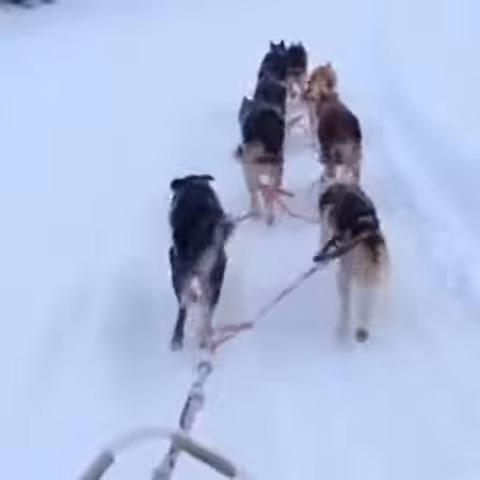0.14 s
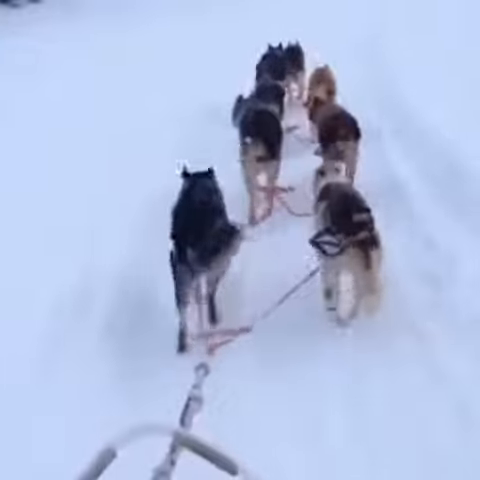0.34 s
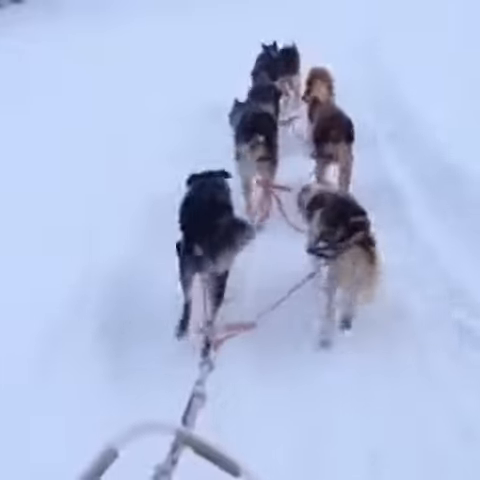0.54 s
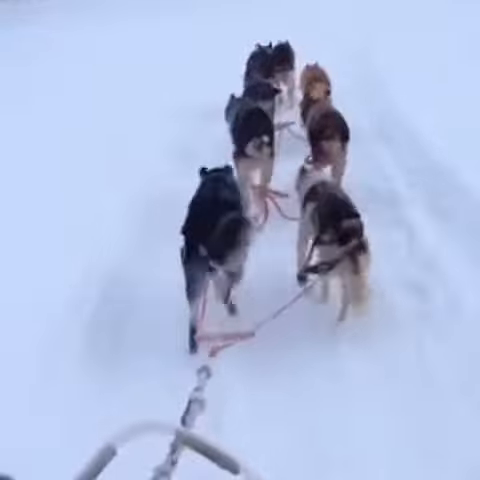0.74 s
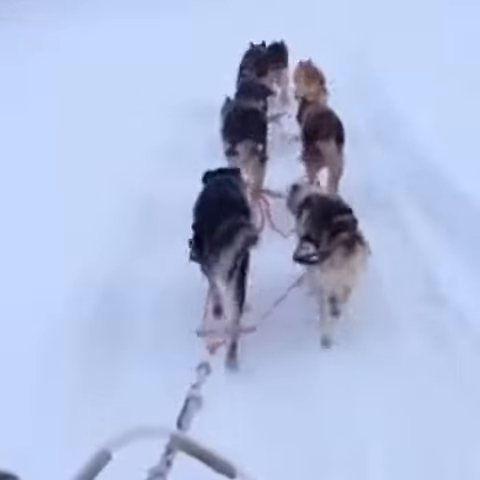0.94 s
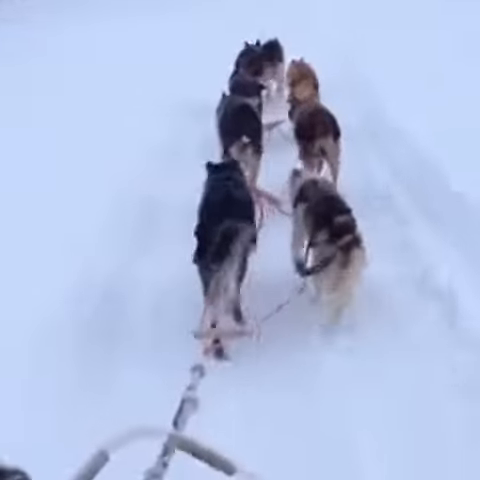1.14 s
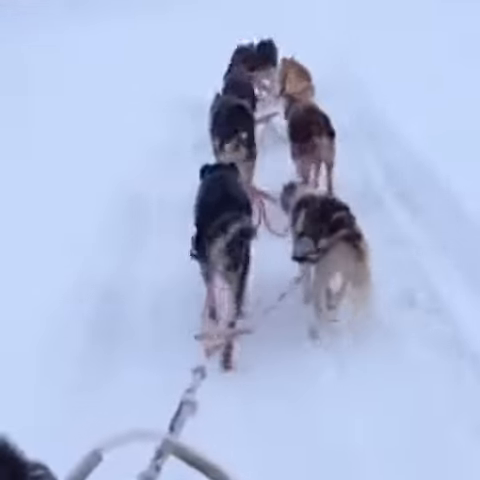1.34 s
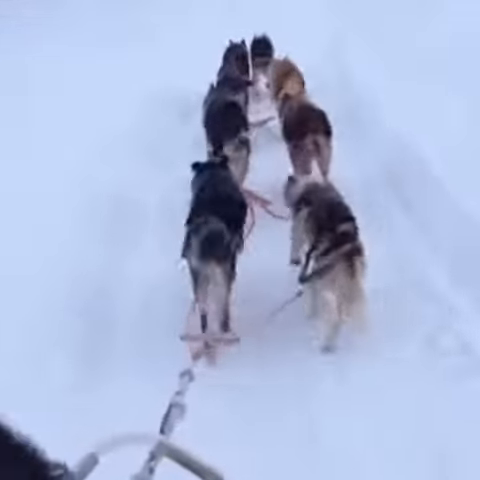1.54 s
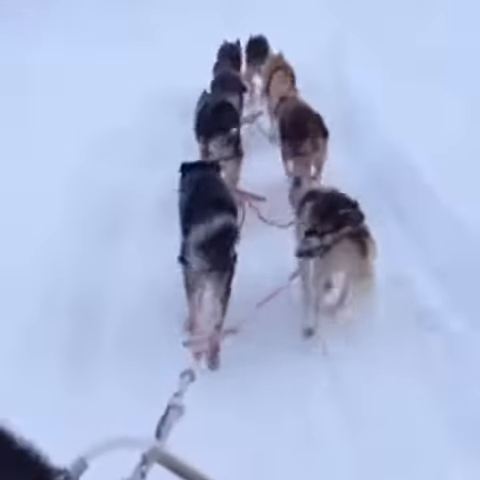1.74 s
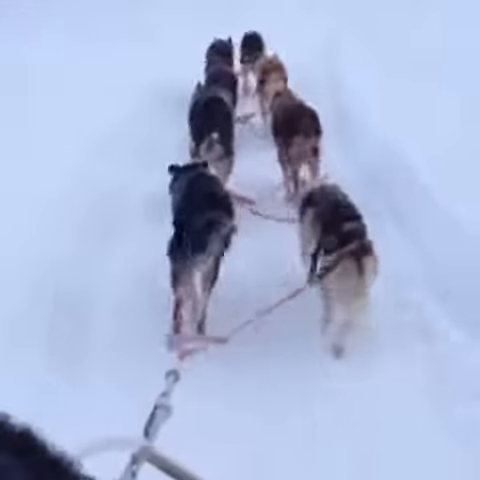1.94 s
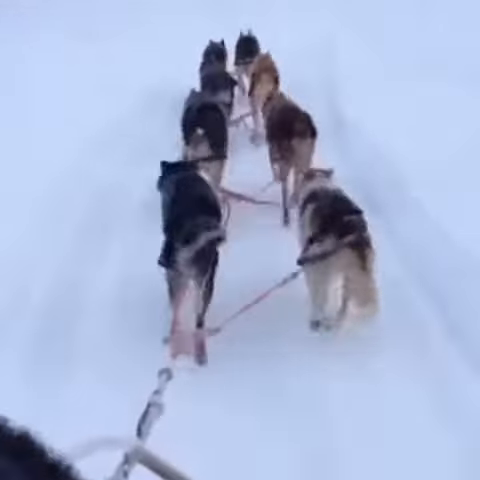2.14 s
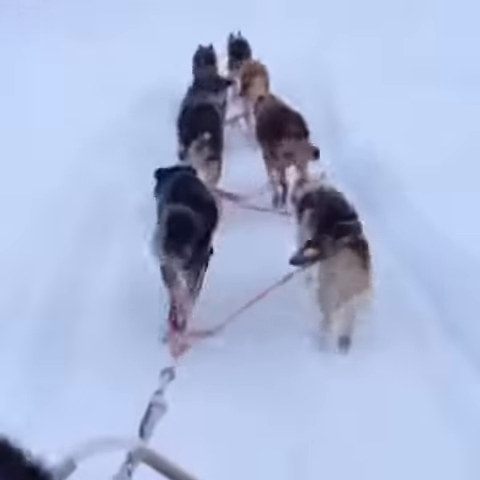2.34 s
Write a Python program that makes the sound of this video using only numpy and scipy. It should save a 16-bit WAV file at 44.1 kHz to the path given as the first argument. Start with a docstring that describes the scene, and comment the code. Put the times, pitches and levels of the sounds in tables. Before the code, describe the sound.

Dog sled runners hiss and crunch steadily over packed snow, heard close from the sled outdoors without echo; frame bumps thud low, rigging clicks and knocks sharply midway, then rasps and thumps grow busier.

```python
"""The runners of a dog sled hiss and crunch along a snowy trail: noise mixed with dense tiny clicks.
They rasp now and then on firmer snow, in short swells of coarser crunch.
The frame drums as low noise and thuds at bumps as short dying tones; wind nudges the microphone.
A small harness ring jingles in two high tones; the rigging ticks and knocks once.
All is heard from the sled itself, the same in both ears."""
import sys
import numpy as np
from scipy import signal
from scipy.fft import rfft, irfft
from scipy.io import wavfile
from scipy.ndimage import uniform_filter1d

SR = 44100
rng = np.random.default_rng(int(sys.argv[2]) if len(sys.argv) > 2 else 0)


def wav_record(signal):
    """Record a signal, one row per channel, as 16-bit PCM in the file named by sys.argv[1]."""
    frames = np.transpose(np.atleast_2d(signal))
    bounded = np.clip(frames, -1, 1)
    # unit amplitude maps onto the largest positive 16-bit level
    quanta = np.round(bounded * 32767).astype(np.int16)
    wavfile.write(sys.argv[1], SR, quanta)


N = 110250  # samples, 2.5 seconds

# In the spectra below only the shape counts: each coloured sound is scaled to its level afterwards.

# Steady sliding of the runners, before the trims below.
# Each row: time in seconds, level of the low rush in dB, of the hiss in dB, of the fine spray in dB.
GLIDE_LEVELS = [(0.03, -43, -40.5, -48), (0.25, -43.5, -39.5, -49), (0.52, -44.5, -43, -49.5),
                (0.97, -44.5, -40.5, -49.5), (1.29, -48, -43, -50.5), (1.54, -47, -45, -49),
                (1.7, -48, -45, -51.5), (2.02, -50, -43.5, -52.5), (2.33, -49.5, -47, -52.5),
                (2.46, -48, -45, -49)]
RUSH_TRIM_DB, HISS_TRIM_DB, SPRAY_TRIM_DB = 0.5, -0.5, 0.5
# Spectra of the rush, the hiss and the spray. Each row: frequency in Hz, strength in dB per Hz.
RUSH_SPECTRUM = [(300, -5), (410, 7), (500, 5), (620, 2.5), (760, 5), (900, 0), (1150, 0), (1330, -0.5),
                 (1550, -0.5), (1800, -9.5), (2600, -8)]
HISS_SPECTRUM = [(1100, -76), (1750, -1.5), (2400, -1.5), (2850, -2.5), (3300, 2), (4200, -0.5), (5000, -4),
                 (6400, -6.5), (8000, -20.5)]
SPRAY_SPECTRUM = [(4500, -14), (6800, -3), (8300, -4.5), (10500, -7), (12500, -10), (15500, -17.5)]

# Runners rasping on firm snow.
# Each row: time of the peak in seconds, rise in seconds, fall in seconds, level in dB, centre in Hz.
SCRAPES = [(.01, 0.022, 0.022, -40.5, 3500), (.185, 0.0073, 0.046, -41, 4270),
           (.22, 0.035, 0.047, -43, 1880), (.66, 0.024, 0.025, -45, 650), (.94, 0.1, 0.018, -46, 3700),
           (.955, 0.044, 0.02, -44.5, 675), (1.079, 0.0027, 0.004, -41, 890),
           (1.165, 0.0051, 0.0049, -33.5, 600), (1.22, 0.081, 0.043, -45, 5850),
           (1.29, 0.017, 0.014, -43.5, 750), (1.49, 0.043, 0.044, -46, 710),
           (1.497, 0.038, 0.026, -43.5, 2870), (1.525, 0.055, 0.041, -47, 5700),
           (1.636, 0.018, 0.017, -37.5, 4200), (1.665, 0.045, 0.025, -45, 6060),
           (1.782, 0.019, 0.01, -45, 1960), (1.83, 0.0068, 0.013, -44, 3300),
           (1.912, 0.024, 0.011, -38, 4140), (1.927, 0.019, 0.0085, -44.5, 1900),
           (1.924, 0.0095, 0.0079, -38, 2900), (2.0, 0.01, 0.02, -43, 2700),
           (2.065, 0.015, 0.016, -42.5, 3370), (2.1, 0.0078, 0.0075, -46, 2200),
           (2.142, 0.0067, 0.0078, -48, 2290), (2.176, 0.0041, 0.012, -41, 4050),
           (2.224, 0.022, 0.0084, -43, 2700), (2.26, 0.032, 0.012, -41, 4670),
           (2.297, 0.02, 0.011, -37.5, 3300), (2.385, 0.026, 0.014, -49, 2870),
           (2.42, 0.023, 0.053, -46, 4850), (2.456, 0.012, 0.011, -39, 2980),
           (2.487, 0.0086, 0.009, -33.5, 4400), (2.499, 0.019, .02, -41, 1900)]
# Resonances of the runners. Each row: frequency in Hz, strength in dB per Hz.
RUNNER_SPECTRUM = [(500, 7), (1000, 7.5), (1500, 6.5), (1790, 13), (2050, 3), (2380, 5), (2800, -5.5),
                   (3320, 4), (3700, -1.5), (4160, 2), (5200, -4), (6500, -5.5), (14000, -11.5)]

# The frame drumming over the trail, before its trim. Each row: time in seconds, level in dB.
RUMBLE_LEVELS = [(0, -36), (.2, -43.5), (.55, -44.5), (.72, -41.5), (.88, -38), (1.05, -42), (1.3, -38),
                 (1.55, -38), (1.72, -38.5), (1.9, -35.5), (2.0, -33), (2.2, -35), (2.33, -37.5),
                 (2.5, -38)]
# Spectrum of the drumming. Each row: frequency in Hz, strength in dB per Hz.
FRAME_SPECTRUM = [(40, -26), (100, -11), (135, 2), (160, -2), (185, -1.5), (250, -3.5), (300, -4.5),
                  (340, -13.5), (400, -8), (470, -14.5), (700, -35), (1500, -37.5)]
# Bumps that thud through the frame.
# Each row: time in seconds, peak of the tone in dB, pitch in Hz, ring time in seconds.
BUMPS = [(0.023, -32, 174, 0.0055), (0.027, -35.5, 363, 0.02), (.21, -36.5, 412, 0.017),
         (0.27, -33.5, 237, 0.021), (0.274, -34.5, 405, 0.015), (0.287, -30.5, 155, 0.0063),
         (.35, -37, 357, 0.0076), (0.453, -28, 229, 0.0059), (.457, -32.5, 343, .01),
         (.649, -31.5, 220, 0.0036), (0.836, -30.5, 293, 0.026), (0.924, -35, 381, 0.015),
         (0.962, -26, 191, 0.0094), (.978, -26.5, 224, 0.011), (1.028, -26.5, 236, 0.022),
         (1.064, -36, 382, 0.0068), (1.075, -25, 240, 0.0042), (1.113, -31, 170, 0.0077),
         (1.153, -21.5, 178, 0.0037), (1.167, -19.5, 261, 0.0032), (1.171, -26.5, 344, 0.0065),
         (1.181, -25, 171, 0.0062), (1.427, -30.5, 176, 0.049), (1.441, -29, 177.6, 0.038),
         (1.477, -33, 388, 0.005), (1.529, -27.5, 190, 0.049), (1.57, -28.5, 198, 0.0062),
         (1.595, -34, 395, 0.0095), (1.962, -17.5, 205, 0.0041), (1.997, -14.5, 183, 0.0061),
         (2.009, -23.5, 170, 0.039), (2.041, -19.5, 208, 0.0036), (2.132, -28, 255, 0.013),
         (2.182, -24.5, 211.5, 0.019), (2.195, -35.5, 355, 0.03), (2.232, -29, 139, 0.03),
         (2.372, -31.5, 235, 0.017), (2.433, -18.5, 244, 0.0068), (2.477, -29.5, 253, 0.021)]

# Single buffets of wind. Each row: time in seconds, peak in dB, pitch in Hz, ring time in seconds.
BUFFETS = [(0.032, -38, 52.4, 0.025), (0.133, -32, 65.5, 0.012), (.348, -33.5, 67, 0.0067),
           (0.593, -31.5, 58.7, .007), (.745, -42, 56, 0.019), (0.972, -25, 76.6, 0.015),
           (1.034, -34, 60, .015), (1.14, -31.5, 58, 0.02), (1.26, -40, 55, 0.011),
           (1.345, -38, 67.4, 0.034), (1.602, -31, 79, 0.0067), (2.099, -34, 55, 0.024),
           (2.365, -25.5, 58.3, 0.0052)]
# Spectrum of the steady wind. Each row: frequency in Hz, strength in dB per Hz.
WIND_SPECTRUM = [(20, -37), (35, 2), (50, -2.5), (80, 3.5), (110, -4), (200, -44), (500, -84)]

# Jingles of the harness ring.
# Each row: time in seconds, level of the upper tone in dB, lower tone relative to the upper in dB.
JINGLES = [(.305, -47, -20), (.632, -53, -20), (.646, -43.5, -23), (1.032, -45, -4), (1.199, -45, -20),
           (1.207, -46, -20), (1.409, -39.5, -22), (1.418, -39, -22), (1.948, -46.5, -12), (2.188, -46, 5),
           (2.199, -43.5, 4.5), (2.328, -49, 2)]

# Rigging ticks and the knock. Each row: time in seconds, peak in dB, centre in Hz, ring time in seconds.
TICKS = [(1.0798, -21, 2880, 0.0012), (1.161, -22.5, 3480, 0.0013), (1.2427, -26.5, 3800, .0012),
         (1.283, -22, 4970, .0011), (1.4716, -38, 4200, .0005), (1.4715, -12.5, 4400, 0.0004),
         (1.4733, -27, 3400, .0012), (1.4767, -30, 796, 0.0017), (1.478, -40, 700, 0.00095),
         (1.4854, -31, 1700, 0.00068), (1.512, -34.5, 1200, 0.0026)]
# Tones of the line's metal fittings, before each tick's filter.
# Each row: frequency in Hz, level in dB.
FITTING_MODES = [(2550, -6.5), (4650, -3.5), (6500, -5), (9800, -7)]


def db_to_gain(db):
    """Turn decibels into a gain."""
    return 10 ** (np.asarray(db) / 20)


def unit(x):
    """Scale to an average strength (rms) of 1."""
    return x / np.sqrt(np.mean(x ** 2))


def clock():
    """Time of every sample in seconds."""
    return np.arange(N) / SR


def level_curve(rows, column=1):
    """Gain that follows one dB column of a table, in straight lines between rows."""
    rows = np.array(rows)
    return db_to_gain(np.interp(clock(), rows[:, 0], rows[:, column]))


def bin_octaves():
    """Place of each spectrum bin in octaves above 1 Hz."""
    return np.log2(np.maximum(np.arange(N // 2 + 1) * SR / N, 1))


def colour(x, spectrum):
    """Give a sound the shape of a spectrum table, falling away beyond its ends; rms 1."""
    hz, db = np.array(spectrum).T
    octave, knots = bin_octaves(), np.log2(hz)
    octaves_outside = np.maximum(knots[0] - octave, 0) + np.maximum(octave - knots[-1], 0)
    shape_db = np.interp(octave, knots, db) - 24 * octaves_outside  # 24 dB per octave
    return unit(irfft(rfft(x) * db_to_gain(shape_db), N))


def band(x, hz, octaves):
    """Keep a bell-shaped band around a centre frequency."""
    bell = np.exp(-.5 * ((bin_octaves() - np.log2(hz)) / octaves) ** 2)
    return irfft(rfft(x) * bell, N)


def wander(rate):
    """Noise averaged twice over 1 / rate seconds: smooth random wandering with rms 1."""
    width = max(int(SR / rate), 2)
    smooth = uniform_filter1d(rng.standard_normal(N), width)
    return unit(uniform_filter1d(smooth, width))


def strike(at, rise, decay):
    """Envelope that swells to a rounded peak and dies away."""
    t = clock() - at
    before = -.5 * (t / rise) ** 2
    after = (rise - np.hypot(t, rise)) / decay
    return np.exp(np.where(t < 0, before, after))


def ring(at, hz, rise, decay):
    """One tone that swells and dies away, starting anywhere in its cycle."""
    return strike(at, rise, decay) * np.sin(2 * np.pi * (hz * (clock() - at) + rng.random()))


def crunch(grains_per_s, spread_db):
    """Snow crystals breaking: dense clicks of uneven size over smooth friction noise."""
    click_share = 0.51  # of the power
    hit = rng.random(N) < grains_per_s / SR
    # mostly small clicks, a few louder ones
    size = db_to_gain(spread_db * np.minimum(rng.exponential(size=N), 5))
    clicks = unit(hit * size * rng.choice([-1, 1], N))
    friction = rng.standard_normal(N)
    return np.sqrt(click_share) * clicks + np.sqrt(1 - click_share) * friction


def glide():
    """Runners sliding: a low rush, a hiss and a fine spray of crunch that flutter together."""
    grains_per_s, spread_db = 5000, 1.5
    rush = colour(crunch(grains_per_s, spread_db), RUSH_SPECTRUM)
    rush *= level_curve(GLIDE_LEVELS, column=1) * db_to_gain(RUSH_TRIM_DB)
    hiss = colour(crunch(grains_per_s, spread_db), HISS_SPECTRUM)
    hiss *= level_curve(GLIDE_LEVELS, column=2) * db_to_gain(HISS_TRIM_DB)
    spray = colour(crunch(grains_per_s, spread_db), SPRAY_SPECTRUM)
    spray *= level_curve(GLIDE_LEVELS, column=3) * db_to_gain(SPRAY_TRIM_DB)
    flutter_db = 0.92 * wander(26.3)
    return (rush + hiss + spray) * db_to_gain(flutter_db)


def scrapes():
    """Chattering swells of sparser crunch, coloured by the runners' resonances, with a faint squeak."""
    grains_per_s, spread_db = 1100, 1.5
    rasp_octaves, squeak_octaves, squeak_db = 0.66, 0.14, -13.5  # the squeak is a much narrower band
    out = np.zeros(N)
    for at, rise, fall, db, hz in SCRAPES:
        t = clock() - at
        snow = colour(crunch(grains_per_s, spread_db), RUNNER_SPECTRUM)
        body = unit(band(snow, hz, rasp_octaves))
        squeak = unit(band(snow, hz, squeak_octaves)) * db_to_gain(squeak_db)
        swell = np.exp(-.5 * (t / np.where(t < 0, rise, fall)) ** 2)
        out += db_to_gain(db) * unit(body + squeak) * swell
    chatter_db = 2.5 * wander(160)
    return out * unit(db_to_gain(chatter_db))


def patchy(x, count=36):
    """Split the sliding noise into overlapping narrow bands; each one flickers on its own."""
    flicker_db, flicker_hz = 1.3, 36.2
    spectrum = rfft(x)
    place = np.interp(bin_octaves(), np.log2([400, 14000]), [0, count - 1])
    out = np.zeros(N)
    for k in range(count):
        share = np.maximum(1 - np.abs(place - k), 0)  # triangles that add up to 1
        flicker = unit(db_to_gain(flicker_db * wander(flicker_hz)))
        out += irfft(spectrum * share, N) * flicker
    return out


def frame():
    """The frame drums all the time as low noise; each bump adds a dying tone with a little noise."""
    trim_db, flutter_db = -1, 2.5 * wander(44)
    out = colour(rng.standard_normal(N), FRAME_SPECTRUM)
    out *= level_curve(RUMBLE_LEVELS) * db_to_gain(trim_db + flutter_db)
    rise_s, shake_db = 0.0017, -18.5
    shake = unit(band(rng.standard_normal(N), hz=258, octaves=0.58)) * db_to_gain(shake_db)
    for at, db, hz, decay in BUMPS:
        thud = ring(at, hz, rise_s, decay) + shake * strike(at, rise_s, decay)
        out += db_to_gain(db) * thud
    return out


def wind():
    """Low turbulence at the microphone, as wandering noise, with single buffets as low dying tones."""
    level_db, wander_db, rise_s = -52, 1, 0.0034
    out = colour(rng.standard_normal(N), WIND_SPECTRUM) * db_to_gain(level_db + wander_db * wander(5.2))
    for at, db, hz, decay in BUFFETS:
        out += db_to_gain(db) * ring(at, hz, rise_s, decay)
    return out


def harness():
    """A small metal ring tinkles in two quickly dying tones; the upper pitch varies a little."""
    upper_hz, lower_hz, rise_s, decay_s = 11900, 7240, 0.0013, 0.0061
    out = np.zeros(N)
    for at, db, lower_db in JINGLES:
        pitch = upper_hz * (1 + 0.009 * rng.standard_normal())
        upper = ring(at, pitch, rise_s, decay_s)
        lower = ring(at, lower_hz, rise_s, decay_s) * db_to_gain(lower_db)
        out += db_to_gain(db) * (upper + lower)
    return out


def rigging():
    """Dry, very short clacks of the line's fittings: a noisy crack plus metal tones, in one wide band."""
    rise_s, modes_db, octaves = .0001, -5, .82
    out = np.zeros(N)
    for at, db, hz, decay in TICKS:
        crack = rng.standard_normal(N) * strike(at, rise_s, decay)
        modes = np.zeros(N)
        for mode_hz, mode_db in FITTING_MODES:
            modes += db_to_gain(mode_db) * ring(at, mode_hz, rise_s, decay)
        clack = crack / np.abs(crack).max() + db_to_gain(modes_db) * modes
        clack = band(clack, hz, octaves)  # a lower centre sounds duller
        out += db_to_gain(db) * clack / np.abs(clack).max()
    return out


def scene():
    """Everything close by in open air, without echo, the same in both ears."""
    sliding = patchy(glide() + scrapes())
    mono = sliding + frame() + wind() + harness() + rigging()
    return np.array([mono, mono])


def record(dry):
    """The recorder cuts the top: a steep filter removes the treble above 15400 Hz."""
    low_pass = signal.ellip(10, .2, 70, 15400, fs=SR, output="sos")
    return signal.sosfilt(low_pass, dry)


dry = scene()
out = record(dry)
wav_record(out)
```